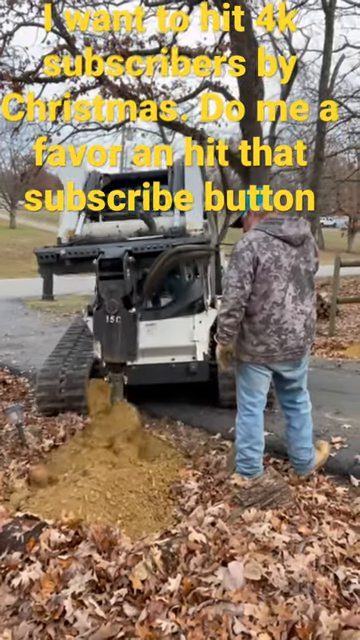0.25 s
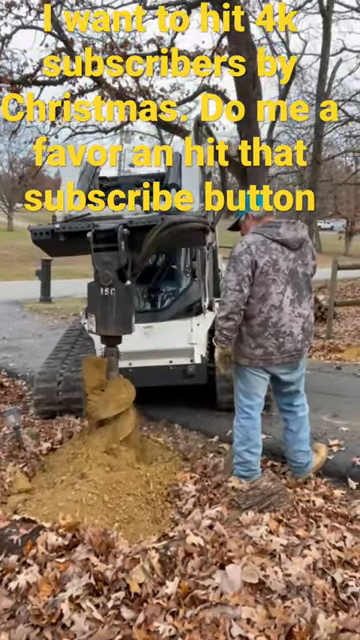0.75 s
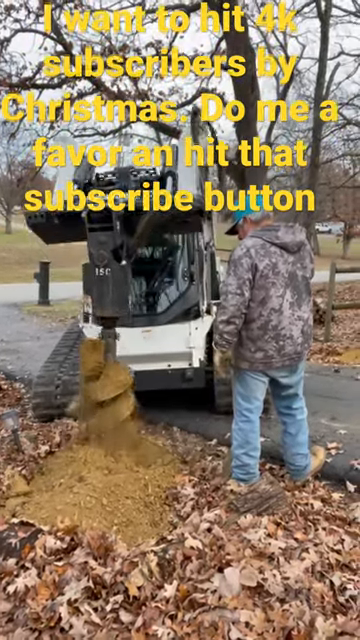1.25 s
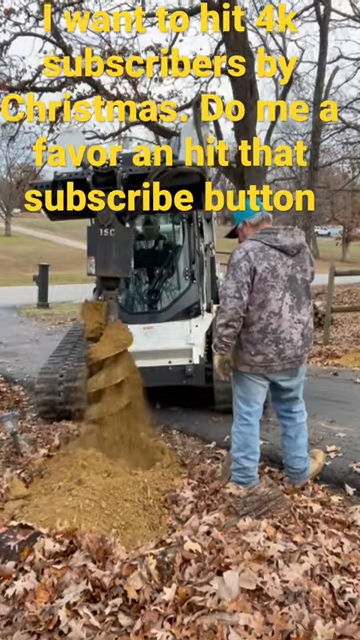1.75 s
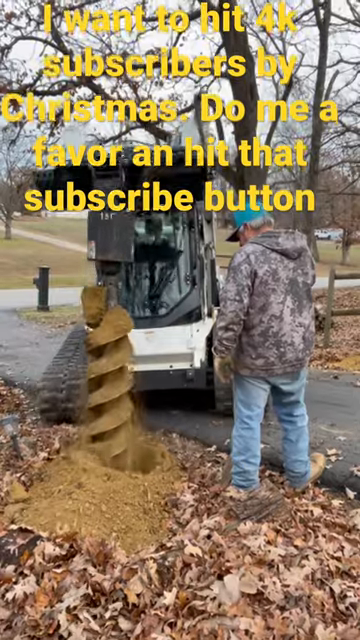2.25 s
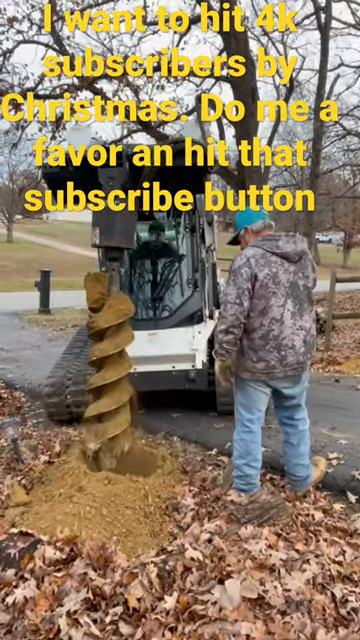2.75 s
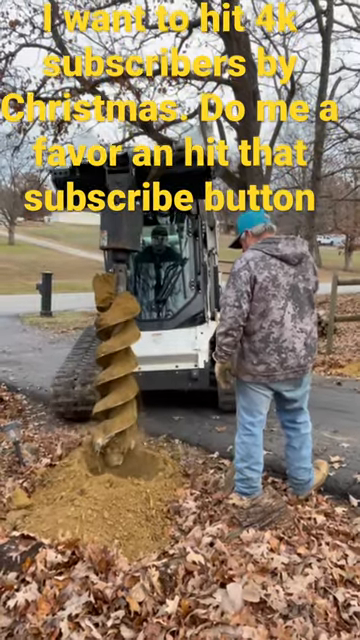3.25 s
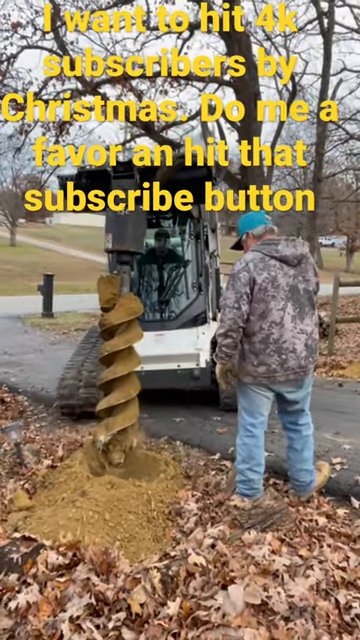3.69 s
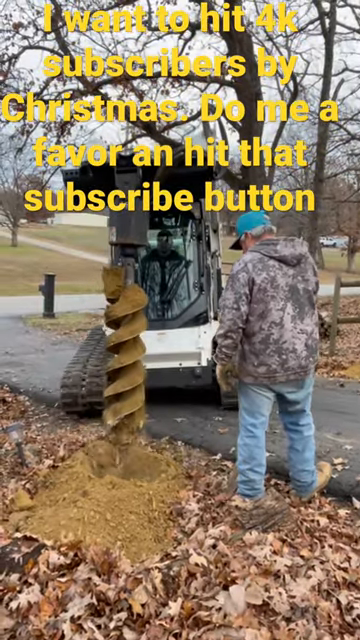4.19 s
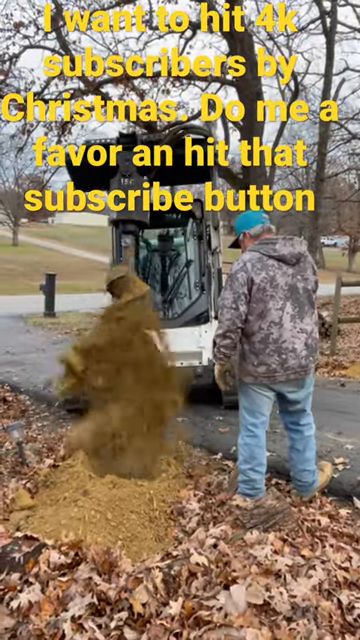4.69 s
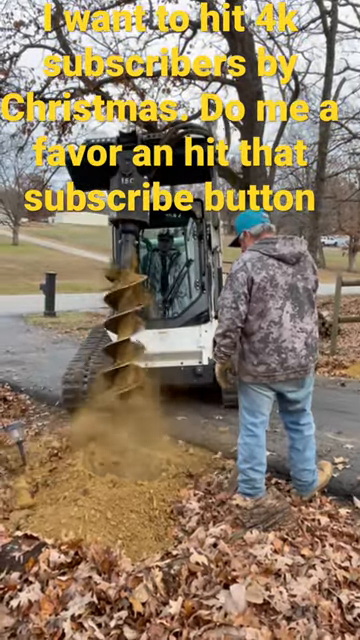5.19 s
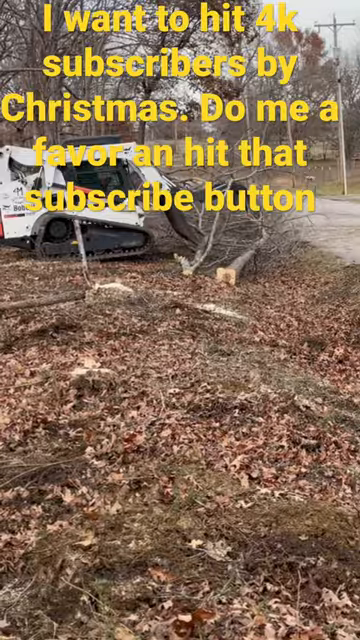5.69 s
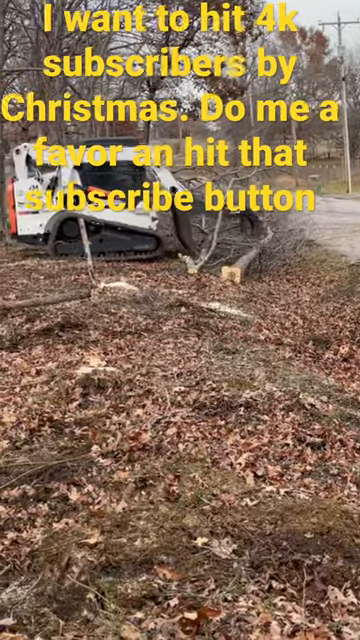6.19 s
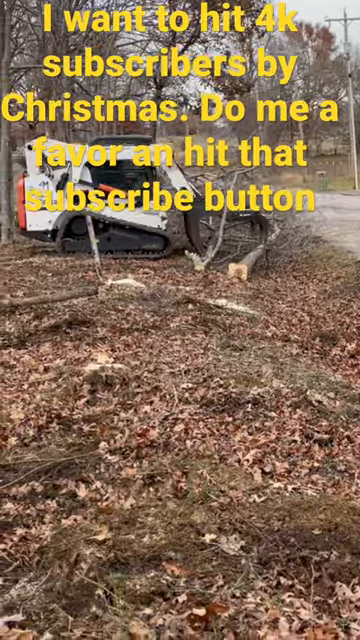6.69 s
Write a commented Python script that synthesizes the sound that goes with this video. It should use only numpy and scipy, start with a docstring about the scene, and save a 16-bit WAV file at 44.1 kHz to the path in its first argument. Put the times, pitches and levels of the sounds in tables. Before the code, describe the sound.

Stereo handheld pickup in an open yard, dry with little reverberation. A nearby diesel machine drones and whines under load while caked steel knocks in its coupling. Knocks are sparse at first, then crowd into heavy clattering thuds with gritty showers of dirt on leaves. Suddenly the view changes: the same kind of engine, lower and more distant, with two tiny ticks.

```python
"""A diesel skid steer lifts an earth auger out of its hole close by: sines tied to one phase give low hums and
pump whine, shaped noise the engine roar. Steel coupling clanks are damped modes driven by random chatter, boom
thuds short sagging tone bursts. Later, soil showers off the shaken bit as dense random grains.
A hard cut follows to the machine working farther off among branches: other tones and roar, and two tiny ticks."""
import sys
import numpy as np
from scipy import signal
from scipy.fft import rfft, irfft, next_fast_len
from scipy.io import wavfile
from scipy.ndimage import uniform_filter1d, map_coordinates

SR = 44100
rng = np.random.default_rng(int(sys.argv[2]) if len(sys.argv) > 2 else 0)


def output_pcm(signal):
    """Save a mono or channel-first signal as 16-bit PCM at the path in sys.argv[1].

    Samples are clipped to [-1, 1] before scaling.
    """
    pcm = np.clip(np.atleast_2d(signal).T, -1, 1) * 32767
    wavfile.write(sys.argv[1], SR, np.round(pcm).astype(np.int16))


N = 306054

CUT_S = 5.672
# levels of drone and noise: (time [s], low hums [dB], pump [dB], pump octave [dB], noise reference [dB])
NEAR_DRIVE = [(0, -27, -22.5, -23.5, -24.5), (1.5, -24.5, -21.5, -26, -23.5),
              (2.4, -24.5, -22.5, -27.5, -24.5), (3.0, -26.5, -21, -27, -24.5),
              (3.55, -27, -23, -26.5, -25), (3.68, -28.5, -21.5, -24, -24.5),
              (3.85, -26, -25.5, -24.5, -25), (4.3, -26, -23.5, -25.5, -23.5),
              (4.95, -25.5, -22.5, -26.5, -24), (5.68, -28.5, -24, -27, -26)]
FAR_DRIVE = [(5.67, -33, -35.5, -57, -31.5), (5.82, -33.5, -37, -61, -30.5), (5.95, -32, -33.5, -52, -31),
             (6.16, -37, -32.5, -51, -32), (6.25, -31, -33.5, -49, -31.5), (6.42, -32, -32.5, -45, -30.5),
             (6.68, -38, -32, -42.5, -30.5), (6.94, -34, -32.5, -42.5, -30.5)]
# low hums and tones: (multiple of crankshaft speed [1], level relative to the low hums [dB])
# some, like the far 57 Hz hum, are not engine orders
NEAR_HUMS = [(2, 1.5), (3, -7.5), (3.5, -10), (4, -4.5), (4.5, -10.5), (5, -19.5), (7.5, -18), (8, -18.5),
             (8.5, -17.5), (10, -17), (10.5, -23), (11, -14.5), (11.5, -27), (12, -24), (14, -19),
             (15, -17.5), (16, -20.5), (18, -21), (22, -23)]
FAR_HUMS = [(1.55, 1.5), (3.5, -8.5), (4.65, -6), (9, -25), (10, -17), (18, -17.5), (23, -22), (30.8, -21),
            (38.5, -26), (53.9, -23)]
# pump whine: (pump harmonic [1], level relative to the octave [dB])
NEAR_WHINE = [(3, -14.5), (4, -21), (5, -25.5), (6, -24.5), (8, -25.5)]
FAR_WHINE = [(3, -5)]
# engine roar spectrum: (frequency [Hz], relative density [dB per Hz])
NEAR_ROAR = [(18, -60), (30, -11.5), (75, 1.5), (162, -3), (202, -8.5), (256, 0), (308, -5.5), (505, -2),
             (653, -12), (770, -7.5), (960, -12.5), (1100, -21), (1380, -14.5), (2400, -28.5), (3120, -40),
             (5280, -120)]
FAR_ROAR = [(18, -47), (30, -10), (65, -4), (108, -1.5), (180, -0.5), (238, -7.5), (297, -12), (478, -16),
            (574, -15.5), (1150, -12.5), (1570, -24), (2400, -37), (3120, -61), (5280, -120)]
# hiss spectrum: (frequency [Hz], relative density [dB per Hz])
NEAR_HISS = [(1060, -64), (1800, -0.5), (2050, 2.5), (2400, -7), (2720, 1.5), (3090, -7), (3700, -7),
             (4100, -6.5), (4500, -9), (5390, -12.5), (5800, -7.5), (8450, -11), (10000, -15.5),
             (11400, -12.5), (12300, -21), (12900, -56)]
FAR_HISS = [(1060, -45), (1800, -10.5), (2000, -3.5), (2340, -10), (2600, -6.5), (3900, -18), (5900, -15.5),
            (7660, -23.5), (9500, -22), (11100, -23), (12000, -34), (12900, -55)]
# brief weakenings of the pump octave: (time [s])
OCTAVE_DROPS = [1.76, 2.39, 2.95, 3.58, 4.05, 5.01]
# brief drops in drone and noise level after the hardest knocks, as from automatic gain:
# (start time [s], gain [dB], hold [s])
LEVEL_DROPS = [(5.146, -5, 0.13), (5.402, -4, 0.038)]
# coupling clanks: (time [s], level [dB], treble setting [dB], favoured pitch [Hz], rattle [s])
CLANKS = [(0.505, -9, -46, 1110, 0.01), (1.705, -18.5, -25, 3600, 0.011), (1.712, -16.5, -25, 1480, 0.0074),
          (2.146, -8.5, -2.5, 1760, 0.014), (2.370, -11, -2.5, 1804, 0.0086),
          (2.385, -17, -0.5, 3420, 0.019), (4.043, -21.5, -22, 2000, .015), (4.148, -20, -26, 1500, 0.015),
          (4.171, -16.5, -26, 3220, .011), (4.271, -26.5, 2, 2927, .037), (4.31, -18.5, -28, 1440, .012),
          (4.319, -18.5, -26, 1640, 0.011), (4.928, -8.5, -5, 1290, 0.011),
          (5.115, -7.5, -1.5, 1510, 0.016), (5.151, -8, 3.5, 1470, 0.0087), (5.174, -19, -26, 1960, 0.039),
          (5.383, -20, -9, 2460, 0.0075), (5.39, -9.5, -26, 1680, .012), (5.409, -18, 2, 1390, 0.025),
          (5.428, -12, -19, 1296, 0.011), (5.453, -14.5, 0.5, 1400, 0.015), (5.585, -24, -10, 2540, 0.018)]
# lower steel modes of the coupling: (frequency [Hz], relative level [dB], t60 [s])
STEEL_MODES = [(1050, -3, 0.036), (1212, 8.5, 0.025), (1300, -7, 0.04), (1407, 4, 0.017),
               (1580, -1.5, 0.0087), (1755, 8.5, 0.026), (1849, 3, 0.044), (1993, 8.5, 0.024),
               (2203, 4.5, 0.037), (2500, -3, 0.027), (3045, -25, 0.032), (3390, -8, 0.037),
               (4020, -9, 0.035)]
# upper steel modes of the coupling: (frequency [Hz], relative level [dB], t60 [s])
STEEL_TOP_MODES = [(4320, -31, 0.02), (4850, -3, 0.054), (6020, 6, 0.03), (6100, 4, 0.028), (6800, 7, 0.07),
                   (9400, -54, .01)]
# boom thuds: (time [s], level [dB], starting pitch [Hz], panel ring relative to thud [dB])
THUDS = [(1.531, -15, 263, -2), (1.568, -26, 264, -4), (1.71, -12.5, 288, -11.5), (2.39, -9, 251, -11.5),
         (4.045, -18, 288, -3.5), (4.183, -7, 262, -23), (4.284, -9.5, 246, -9), (4.932, -13, 246, -13),
         (5.126, -6, 249, -10), (5.161, -11, 315, -5), (5.41, -4, 274, -13), (5.461, -16, 268, -12),
         (5.534, -22, 254, -24), (5.588, -20, 244, -16)]
# ringing boom panel: (frequency [Hz], relative level [dB], t60 [s])
BOOM_MODES = [(293.5, 2, 0.63)]
# showers of earth: (start time [s], level [dB], hold [s])
SOIL_SHOWERS = [(4.5, -41.5, 0.25), (4.774, -28.5, 0.096), (4.948, -38.5, 0.19), (5.127, -34.5, 0.027),
                (5.304, -52, 0.33), (5.373, -31, 0.029), (5.643, -42, 0.062)]
# spectrum of falling soil: (frequency [Hz], relative density [dB per Hz])
PATTER = [(530, -34), (1000, -10), (2470, -3.5), (3680, -9), (6190, -1.5), (8500, -10), (11400, -9),
          (12300, -18), (12900, -23)]
# tiny ticks: (time [s], level [dB], pitch [Hz])
TICKS = [(5.7444, -42, 8600), (5.8568, -31.5, 8700)]
# decay of the scattered sound: (frequency [Hz], t60 [s])
YARD_DECAY = [(200, 0.048), (2000, 0.092), (10000, 0.068)]
# difference between ports: (frequency [Hz], direct-wave share [1], direct-wave phase [rad])
PORTS = [(60, 1, 2.7), (250, 1, 2.3), (620, 1, 1.35), (1010, 1, 1.37), (1200, 0.49, 0.4),
         (1780, 0.96, 1.47), (3050, .4, 1.83), (6100, 0.34, 0.5), (9000, 0.79, 1.9), (11000, .7, 1.46)]
# gain of the difference between ports: (frequency [Hz], level [dB])
NEAR_SIDE = [(60, -14), (140, -13), (250, -13.5), (330, -10.5), (510, -5), (640, -3.5), (800, -6.5),
             (1080, 5), (1350, 0.5), (1750, -2.5), (2390, -2), (3600, 2.5), (5420, 0), (6400, -3.5),
             (8600, -3), (10000, 7.5), (11400, 0.5), (11700, -45)]
FAR_SIDE = [(60, -20), (310, -17), (460, -4), (700, -6.5), (1050, -3.5), (1590, 3), (2390, -6), (3600, 3),
            (5000, -6), (6200, -12), (8700, -2), (10000, 1), (11300, 3), (11700, -32)]

NEAR_PUMP_HZ, FAR_PUMP_HZ = 255.0, 238.7
PUMP_PER_TURN = 6.422  # pump strokes per crankshaft turn
NEAR_HISS_DB, FAR_HISS_DB = -14, -16  # relative to the noise reference
OCTAVE_DROP_DB, OCTAVE_DROP_S = -7.5, 0.044
DROP_FALL_S, DROP_RISE_S = 0.018, 0.095
EDGE_DB, EDGE_GROWTH = -23.5, 0.44  # sharp edge: base level, and dB per dB of treble setting
THUD_S, SHAKE_DB, SHAKE_T60_S = 0.0202, -10.5, 0.3
SHOWER_RISE_S, SHOWER_FALL_DB_PER_S = 0.026, 154
TOP_HZ = 12890


def amp(db):
    """Level to amplitude: 20 dB is a factor of ten."""
    return 10 ** (np.asarray(db) / 20)


def unit(x):
    """Normalisation by effective value: x at rms 1."""
    return x / np.sqrt(np.mean(x ** 2) + 1e-20)


def along(points, hz, axis=1):
    """Logarithmic frequency scale: one column of a table, interpolated over log frequency."""
    table = np.transpose(points)
    return np.interp(np.log(hz + 1), np.log(table[0] + 1), table[axis])


def curves(rows):
    """Piecewise linear variation: one curve for each column after the time."""
    s, *cols = np.transpose(rows)
    return [np.interp(np.arange(N) / SR, s, c) for c in cols]


def wobble(rate):
    """Slow random modulation: a smooth curve through random knots, rate of them a second."""
    knots = rng.standard_normal(int(N * rate / SR) + 4)
    return map_coordinates(knots, [np.arange(N) * rate / SR])


def gate(start, rise, hold, fall):
    """Trapezoidal envelope: 0 to 1 in rise seconds, held, then back to 0."""
    return np.interp(np.arange(N) / SR - start, np.cumsum([0, rise, hold, fall]), [0, 1, 1, 0])


def filtered(x, response):
    """Linear filtering: the spectrum of x times a complex response of frequency."""
    m = next_fast_len(N + SR // 2)
    return irfft(rfft(x, m) * response(np.fft.rfftfreq(m, 1 / SR)), m)[..., :N]


def rush(spectrum, patchy_db):
    """Incoherent broadband noise: two unrelated noises, jointly rms 1, sharing patches of random gain."""
    z = signal.stft(rng.standard_normal((2, N + 512)), nperseg=512)[2]
    field = uniform_filter1d(rng.standard_normal(z.shape[1:]), size=6, axis=0)
    field = uniform_filter1d(field, size=10, axis=1)
    pair = signal.istft(z * amp(patchy_db * unit(field)), nperseg=512)[1][:, :N]
    return unit(filtered(pair, lambda hz: amp(along(spectrum, hz))))


def tones(phase, table, waver_db, rate):
    """Rotational tones: sines at multiples of one phase, wavering separately; 0 dB is rms 1 before waver."""
    total = 0
    for k, db in table:
        level = np.sqrt(2) * amp(db + waver_db * wobble(rate))
        total = total + level * np.sin(k * phase + rng.uniform(0, 2 * np.pi))
    return total


def ringing(modes, push, near_hz=None):
    """Modal response to a short force, peak 1; the point of impact favours modes near one pitch."""
    t = np.arange(SR // 4) / SR
    scatter_db = 2 * rng.standard_normal(len(modes))
    ring = 0
    for (hz, db, t60), extra_db in zip(modes, scatter_db):
        favour_db = -18 * np.sqrt(np.abs(np.log2(hz / near_hz))) if near_hz else 0
        ring = ring + amp(db + extra_db + favour_db - 60 * t / t60) * np.sin(2 * np.pi * hz * t)
    out = signal.fftconvolve(ring, push)[:len(t)]
    return out / np.abs(out).max()


def yard(x):
    """Diffuse scattering from ground, machine and trees: noise with a frequency-dependent decay."""
    hz, t, z = signal.stft(rng.standard_normal((2, SR // 3)), SR, nperseg=256)
    decay = amp(-60 * t / along(YARD_DECAY, hz)[:, None])
    tail = signal.istft(z * decay, SR, nperseg=256)[1]
    return signal.fftconvolve(x, tail / np.linalg.norm(tail[0]), axes=1)[:, :N]


def ticks():
    """Impulsive radiation: two tiny bright ticks, each a fast-decaying tone with noise."""
    out, t = np.zeros(N), np.arange(SR // 50) / SR
    for s, db, hz in TICKS:
        grain = np.sin(2 * np.pi * hz * t) + 0.89 * rng.standard_normal(len(t))
        out[round(s * SR):][:len(t)] += amp(db - 60 * t / 0.0084) * grain
    return out


def soil():
    """Random impact noise: clods and grit on dry leaves, uneven grains in showers that swell, hold and thin out."""
    t = np.arange(N) / SR
    level = 0
    for s, db, hold in SOIL_SHOWERS:
        swell = np.clip((t - s) / SHOWER_RISE_S, 0, 1)
        thinning_db = SHOWER_FALL_DB_PER_S * np.maximum(t - s - SHOWER_RISE_S - hold, 0)
        level = level + swell * amp(db - thinning_db)
    sizes = amp(4 * np.minimum(rng.exponential(size=(2, N)), 3))
    landed = rng.random((2, N)) < 4500 / SR  # on average 4500 grains a second in each path
    grains = landed * rng.standard_normal((2, N)) * sizes
    bed = 1.3 * rng.standard_normal((2, N)) + unit(grains)
    patter = unit(filtered(bed, lambda hz: amp(along(PATTER, hz))))
    return level * amp(0.72 * wobble(44)) * patter


def thuds():
    """Structure-borne shock up the boom: a few low cycles swell and stop, a panel rings and the frame rumbles."""
    out, shake = np.zeros(N + SR), np.zeros(N + SR)
    t, tail = np.arange(round(THUD_S * SR)) / SR, np.arange(SR // 2) / SR
    swell = np.abs(np.sin(np.pi * t / THUD_S)) ** 0.34
    for s, db, hz, panel_db in THUDS:
        burst = swell * np.sin(2 * np.pi * hz * t * (1 - 1.37 * t))  # the pitch sags
        start = round((s - .003) * SR)  # the swell begins 3 ms ahead of the listed time
        out[start:][:len(t)] += amp(db) * burst
        out[start:][:SR // 4] += amp(db + panel_db) * ringing(BOOM_MODES, np.hanning(SR // 400))
        rumble = amp(db + SHAKE_DB - 60 * tail / SHAKE_T60_S)
        shake[start:][:len(tail)] += rumble * (1 - np.exp(-tail / 0.0091))
    return out[:N] + shake[:N] * rush(NEAR_ROAR, patchy_db=2)


def clanks():
    """Modal excitation by rattling slack: dull caked steel rings under a broad crack, separately drawn in two paths."""
    out, t = np.zeros((2, N + SR)), np.arange(SR // 16) / SR
    body = signal.butter(3, [850, 4400], "band", fs=SR, output="sos")
    bright = signal.butter(2, [3500, 9000], "band", fs=SR, output="sos")
    edge = signal.butter(2, [8000, 11800], "band", fs=SR, output="sos")
    for s, db, treble_db, hz, rattle in CLANKS:
        shape = np.exp(-(t / max(rattle, .002)) ** 2) * (1 - np.exp(-t / 0.00034))
        for path in out:
            # separate touches, 1.5 ms each
            contacts = amp(4 * rng.standard_normal(len(t) // 64 + 1)).repeat(64)[:len(t)]
            strikes = 4 * (rng.random(len(t)) < 250 / SR)  # sharp metal-on-metal strikes
            strikes[SR // 1000] = 4  # one is certain, 1 ms in
            chatter = shape * contacts * (rng.standard_normal(len(t)) + strikes)
            ring = ringing(STEEL_MODES, chatter, hz)
            ring += amp(treble_db - 19.0) * ringing(STEEL_TOP_MODES, chatter)
            crack = amp(-8) * signal.sosfilt(body, chatter)
            crack += amp(treble_db - 11.5) * signal.sosfilt(bright, chatter)
            crack += amp(EDGE_DB + EDGE_GROWTH * treble_db) * signal.sosfilt(edge, chatter)
            start = round(s * SR)
            path[start:][:len(ring)] += amp(db) * ring
            path[start:][:len(t)] += amp(db) * crack
    return out[:, :N]


def machine(drive, pump_hz, hums, whine, roar, hiss, hiss_db):
    """Rotational sound: hums and pump share one phase; noise throbs twice a crank turn and every second turn."""
    hum_db, pump_db, octave_db, noise_db = curves(drive)
    t = np.arange(N) / SR
    octave_db += OCTAVE_DROP_DB * sum(np.exp(-((t - s) / OCTAVE_DROP_S) ** 2) for s in OCTAVE_DROPS)
    pump = 2 * np.pi * np.cumsum(pump_hz + 0.26 * wobble(4)) / SR  # phases in radians
    crank = pump / PUMP_PER_TURN
    drone = amp(hum_db) * tones(crank, hums, waver_db=0.5, rate=9)
    drone += amp(pump_db) * tones(pump, [(1, 0)], waver_db=1.04, rate=12)
    octave = tones(pump, [(2, 0)], waver_db=.9, rate=12)
    drone += amp(octave_db) * (octave + tones(pump, whine, waver_db=2.2, rate=15))
    throb = 1 + 0.025 * np.cos(2 * crank) + 0.038 * np.cos(crank / 2)
    noise = amp(noise_db - 2.5 + 0.58 * wobble(5.65)) * rush(roar, patchy_db=1.0)
    noise += amp(noise_db + hiss_db + 0.84 * wobble(12)) * rush(hiss, patchy_db=1.15)
    drop_db = sum(db * gate(s, DROP_FALL_S, hold, DROP_RISE_S) for s, db, hold in LEVEL_DROPS)
    return amp(drop_db) * (drone * [[1], [.3]] + throb * noise)  # the tones arrive mostly direct


def ports(pair, side, cancel_db):
    """Two-point interference: the ports differ by a phase-shifted direct wave and by scattered sound.
    Near 10 kHz the ports are half a wave apart, so the sum cancels."""
    def difference(hz):
        share = np.clip(along(PORTS, hz), 0, 1)
        direct = share * np.exp(1j * along(PORTS, hz, axis=2))
        return amp(along(side, hz)) * [direct, np.sqrt(1 - share ** 2)]

    parts = filtered(pair, difference)
    both = filtered(pair[0], lambda hz: amp(cancel_db * np.exp(-((hz - 10100) / 330) ** 2)))
    return both + np.array([[1], [-1]]) * parts.sum(axis=0)


def scene():
    """Superposition of sources in a near and a far view, joined by a hard cut."""
    steel, boom = clanks(), thuds()
    knocks = steel + boom + yard(amp(3.5) * steel + amp(-5.0) * boom)
    near = machine(NEAR_DRIVE, NEAR_PUMP_HZ, NEAR_HUMS, NEAR_WHINE, NEAR_ROAR, NEAR_HISS, NEAR_HISS_DB)
    near = near + knocks + soil()
    far = machine(FAR_DRIVE, FAR_PUMP_HZ, FAR_HUMS, FAR_WHINE, FAR_ROAR, FAR_HISS, FAR_HISS_DB)
    far = far + ticks()
    later = np.clip((np.arange(N) / SR - CUT_S) / .003, 0, 1)  # 3 ms crossfade
    return (1 - later) * ports(near, NEAR_SIDE, cancel_db=-36) + later * ports(far, FAR_SIDE, cancel_db=-31)


def record(dry):
    """Transducer limits: the lowest bass is lost, peaks saturate softly, then the band is cut off at the top."""
    bass_cut = filtered(dry, lambda hz: 1 / (1 + (38 / (hz + 1)) ** 4))
    held = bass_cut / (1 + np.abs(bass_cut) ** 6) ** (1 / 6)
    return filtered(held, lambda hz: hz < TOP_HZ)


dry = scene()
out = record(dry)
output_pcm(out)
```